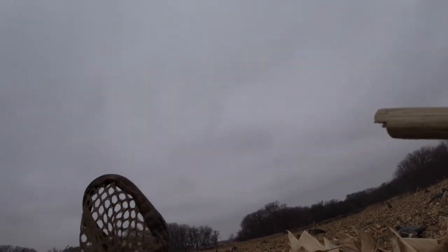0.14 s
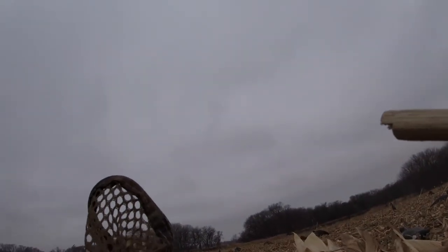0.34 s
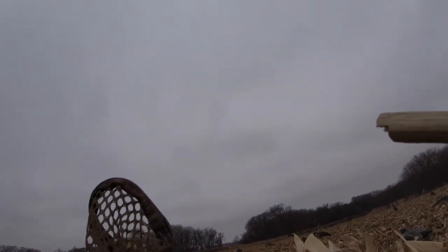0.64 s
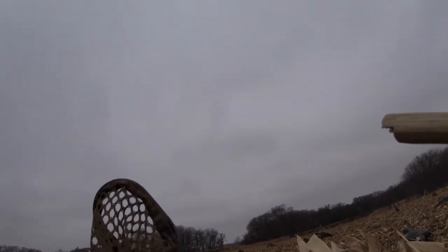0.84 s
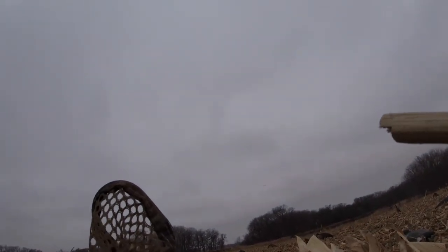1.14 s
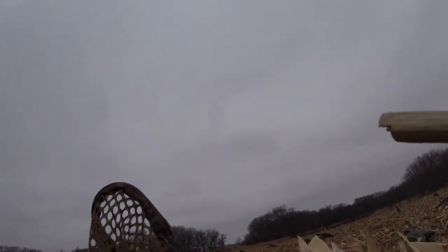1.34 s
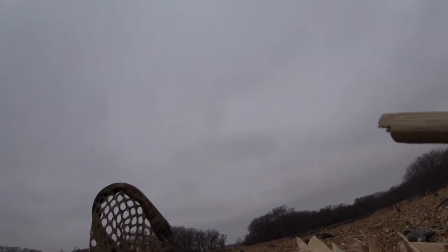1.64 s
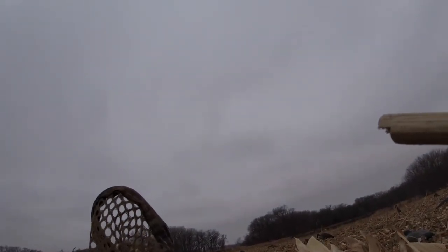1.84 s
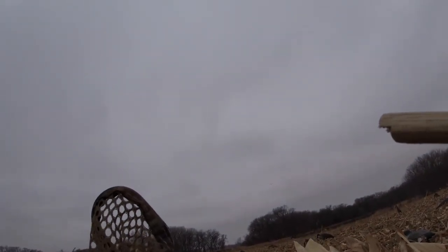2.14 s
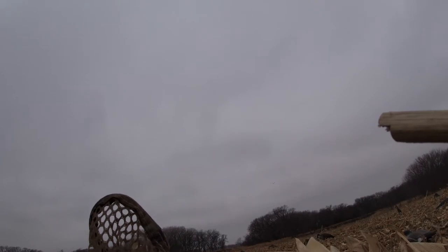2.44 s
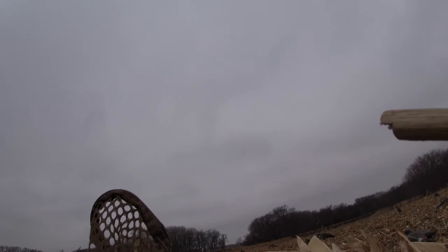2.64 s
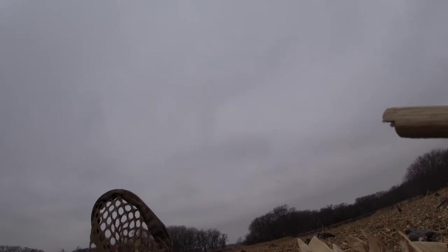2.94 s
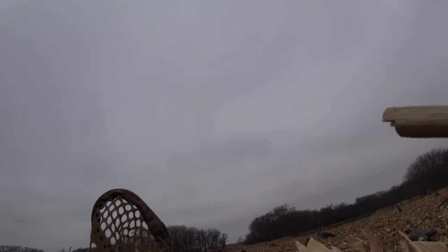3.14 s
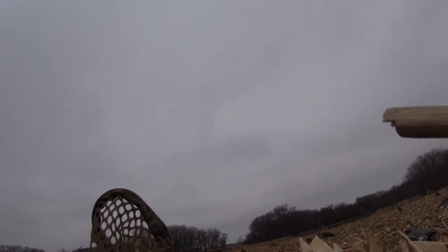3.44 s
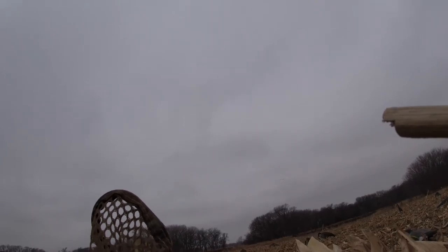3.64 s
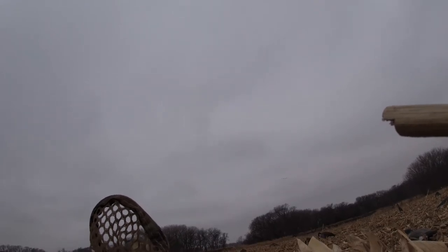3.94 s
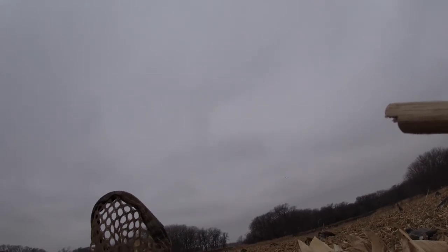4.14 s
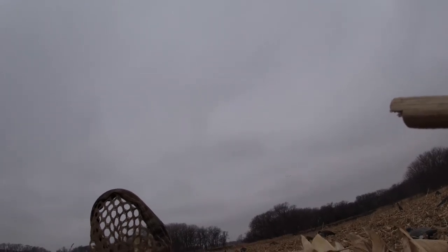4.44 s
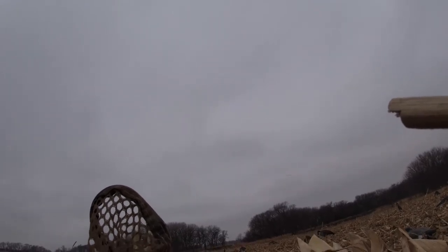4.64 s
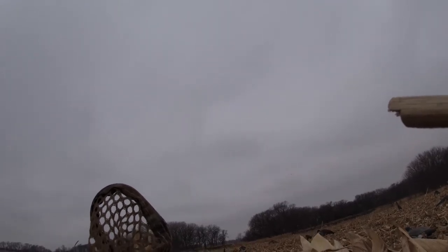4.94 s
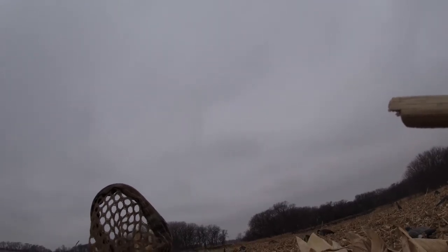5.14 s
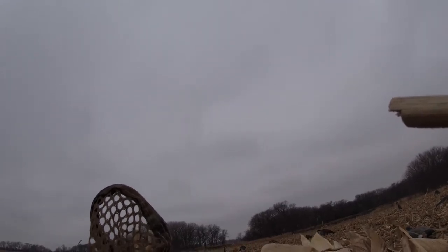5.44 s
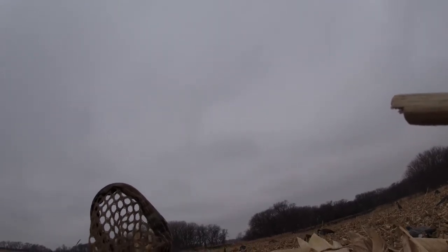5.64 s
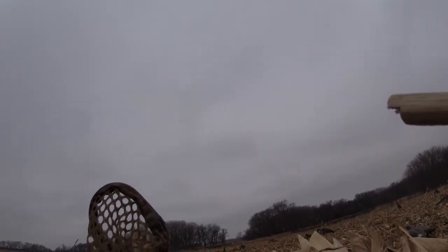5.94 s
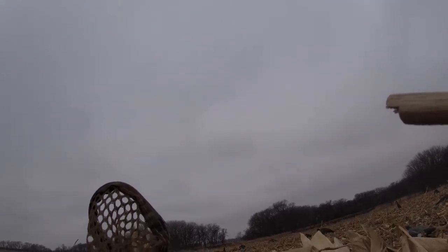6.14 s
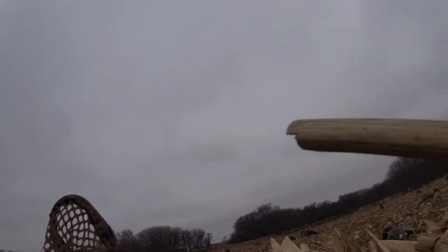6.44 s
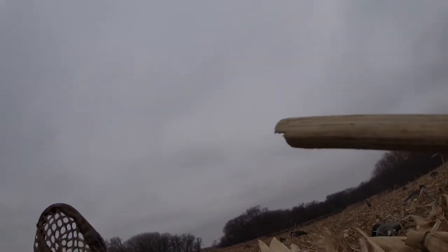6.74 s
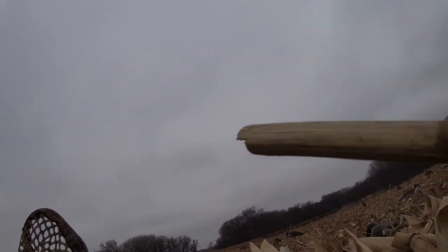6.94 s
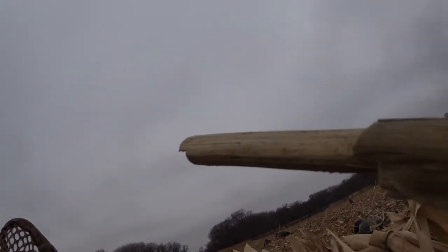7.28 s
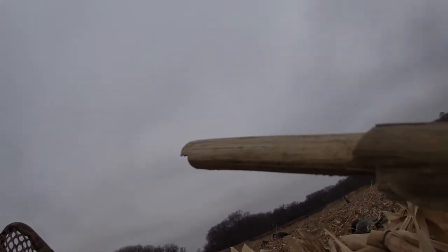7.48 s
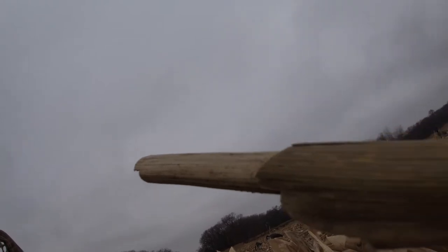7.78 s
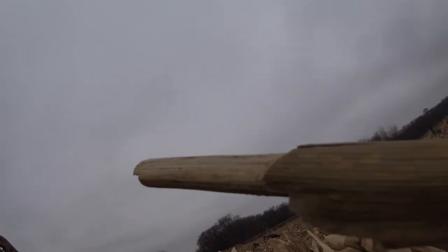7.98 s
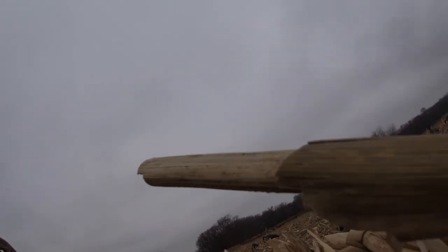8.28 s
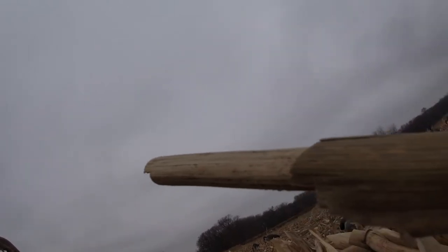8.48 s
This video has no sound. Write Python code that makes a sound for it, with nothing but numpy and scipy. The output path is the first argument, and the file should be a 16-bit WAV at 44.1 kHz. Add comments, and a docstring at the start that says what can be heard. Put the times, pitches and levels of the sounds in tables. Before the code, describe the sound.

Two reed goose calls trade low moans and short honks, one bright and one muffled, while wind buffets the microphone.

```python
"""Two goose calls in a windy stubble field

Two reed goose calls answer each other: a bright one aimed past the microphone and a muffled one close
behind it. Breath makes each reed moan on a low note, then break up into a honk. Wind buffets the
microphone, its housing is knocked a few times, dry stalks rustle and snap, and faint pips sound far off."""
import sys
import numpy as np
from scipy import signal
from scipy.fft import rfft, irfft
from scipy.io import wavfile
from scipy.ndimage import uniform_filter1d, minimum_filter1d

SR = 44100
rng = np.random.default_rng(int(sys.argv[2]) if len(sys.argv) > 2 else 0)


def inscribe(sig):
    """Save sig as 16-bit PCM at rate SR to the path in sys.argv[1].

    A 1-D sig is mono; a 2-D sig holds one channel per row.
    Samples are clipped to [-1, 1] before scaling.
    """
    pcm = np.round(np.clip(np.atleast_2d(sig).T, -1, 1) * 32767)
    wavfile.write(sys.argv[1], SR, pcm.astype(np.int16))


N = 379701

# Honks of the muffled call: (start [s], end [s], early pitch [Hz], pitch before the fall [Hz],
# end pitch [Hz], level [dB], treble boost [dB])
MUFFLED_HONK_NOTES = [ (2.082, 2.121, 643, 652, 530, -22, -2), (2.245, 2.308, 661.6, 636, 515, -23.5, -5),
                      (6.177, 6.316, 679, 659, 530, -26.5, 1.5), (6.376, 6.481, 665, 599, 500, -25, 0.5),
                      (7.413, 7.473, 701, 695, 557, -24.5, 1.5), (8.294, 8.35, 677, 661, 553, -24.5, -0.5)]


def bright_call():
    """A reed call rich in overtones: it moans, clucks and honks."""
    # Moans: (start [s], push of breath [s], end [s], pitch at each of those three times [Hz],
    # level [dB], treble boost [dB])
    moans = [ (0.813, 1.033, 1.165, 523.6, 512.7, 625, -45, 0),
             (2.826, 3.106, 3.172, 488.3, 550, 586, -45, 6),
             (4.051, 4.31, 4.372, 504.6, 551.3, 587, -48, 9.5),
             (8.566, 8.591, 8.61, 508, 519, 547, -41, 1.5)]
    # Blowing harder raises pitch and level together: (pitch [Hz], base tone [dB], overtones [dB])
    pressure = [(500, 2.5, -15), (547, 2, -10.5), (600, 12.5, 1)]
    # Wavering low notes, one list of points each: (time [s], pitch [Hz], level [dB])
    clucks = [
        [(3.3, 429, -43.5), (3.36, 439, -44.5), (3.4, 492, -34), (3.43, 500, -29.5), (3.472, 445, -49)],
        [(7.782, 512, -41), (7.825, 587, -37), (7.895, 598, -37), (7.915, 525, -38.5), (7.94, 500, -59.5)],
    ]
    # How the barrel colours the overtones of low notes: (frequency [Hz], gain [dB])
    barrel = [(900, 18), (1650, 12.5), (2400, -19.5), (2850, 1.5), (3300, -20), (4200, -17.5), (4800, -5),
              (5400, -21), (8000, -42)]
    # Honks: (start [s], break [s], end [s], top pitch [Hz], arch depth [share of pitch], sag [Hz/s],
    # pitch after the break [Hz], level [dB], overtone boost [dB])
    honks = [ (1.155, 1.224, 1.246, 816, 0.055, 1103, 707, -21, -3),
             (3.163, 3.274, 3.315, 881, 0.063, 2, 705, -18.5, 2.5),
             (4.365, 4.484, 4.525, 876.7, 0.072, -1, 694, -18.5, 1.5)]
    # A honk's harmonics, from the second up: (gain [dB])
    honk_overtones = [7, -7, -14.5, -20.5, -11.0, -20, -32, -41, -59.5, -61] + [-57] * 5
    # The reed beats unevenly: (start [s], end [s], depth [factor], hoarseness [factor])
    creaks = [(1.14, 1.255, .5, 1.), (3.115, 3.175, 1.1, .5), (3.265, 3.325, .55, .8),
              (3.375, 3.47, .9, .15), (4.33, 4.375, 1.1, .5), (4.48, 4.535, .55, .8), (7.82, 7.91, .9, .25),
              (7.89, 7.95, .6, .7)]
    low = [blown(row[:3], row[3:6], row[6], pressure) for row in moans]
    low += [[(s, hz, db, db - 14.5) for s, hz, db in cluck] for cluck in clucks]
    treble = [row[-1] for row in moans] + [4] * len(clucks)
    high = [bright_honk(*row) for row in honks]
    return (reed(low, barrel, creaks, treble_db=treble, treble_above=4)
            + reed(high, honk_overtones, creaks))


def bright_honk(start, split, end, top_hz, depth, sag, tail_hz, db, boost_db, break_s=0.0089):
    """Points of one honk: a high arch of pitch that breaks down into a short dull tail."""
    # The arch: (way to the break [0-1], pitch dip [times the depth], base tone [dB], overtones [dB])
    arch = [(0, .6, 2, -12), (0.399, 0.11, -2, -10.5), (.8, .27, -2, -13.5), (1, 1.16, -4, -15)]
    levels = np.array([db, db + boost_db])
    points = []
    for share, dip, *shape_db in arch:
        elapsed = share * (split - start)
        points.append((start + elapsed, top_hz * (1 - depth * dip) - sag * elapsed, *(levels + shape_db)))
    end_hz = tail_hz * (1 - 1.95 * (end - split - break_s))
    return points + [(split + break_s, tail_hz, *(levels + (-5.5, -26))),
                     (end, end_hz, *(levels + (-15, -34)))]


def muffled_call(grunt_hz=398, creak_s=.02):
    """A duller reed call: strong round moans and grunts, and short honks."""
    # Moans: (start [s], push of breath [s], end [s], pitch at each of those three times [Hz], level [dB])
    moans = [ (1.769, 2.002, 2.097, 383.7, 390.8, 416, -22),
             (5.672, 5.96, 6.06, 382.8, 392.9, 418.7, -18.5),
             (7.105, 7.297, 7.432, 409.3, 422.6, 436.3, -21.5), (8.006, 8.198, 8.307, 403, 413.2, 438, -20)]
    # Short low grunts around the honks: (start [s], length [s], level [dB])
    grunts = [(2.226, 0.034, -19.5), (2.306, 0.022, -22.5), (6.162, 0.029, -19), (6.305, 0.015, -19.5),
              (6.358, 0.033, -18.5)]
    # Harmonics of the low notes and of the honks, from the second up: (gain [dB])
    low_overtones = [-1, 8, -20.5, -21, -44]
    honk_overtones = [6.5, -9, -22.5, -23, -25, -26.5, -32, -39.5, -47.5]
    low = [muffled_moan(*row) for row in moans]
    low += [[(t, grunt_hz, db, db - 18.5) for t in (s, s + length)] for s, length, db in grunts]
    high = [muffled_honk(*row[:-1]) for row in MUFFLED_HONK_NOTES]
    treble = [row[-1] for row in MUFFLED_HONK_NOTES]
    # Low notes creak as they end; honks rasp at both ends.
    creaks = [(note[-1][0] - creak_s, note[-1][0] + creak_s, 1.4, .2) for note in low]
    rasps = [(s - creak_s, s + creak_s, .25, .9) for note in high for s in (note[0, 0], note[-1, 0])]
    return (reed(low, low_overtones, creaks)
            + reed(high, honk_overtones, rasps, dulling=19.5, treble_db=treble))


def muffled_moan(start, push, end, start_hz, push_hz, end_hz, db, scoop_s=0.045):
    """Points of one moan: it scoops up to pitch, creeps higher, then rises with a push of breath."""
    # Blowing harder raises pitch and level together: (pitch [Hz], base tone [dB], overtones [dB])
    pressure = [(383.6, -7, -31), (401, -1, -17), (438, 4, -12)]
    times = [start, start + scoop_s, push, end]
    hz = [.94 * start_hz, start_hz, push_hz, end_hz]
    if not any(abs(honk[0] - end) < scoop_s for honk in MUFFLED_HONK_NOTES):
        times, hz = times + [6.118], hz + [396]  # the one moan that runs into no honk sags away
    return blown(times, hz, db, pressure)


def muffled_honk(start, end, start_hz, hold_hz, end_hz, db, rise_s=0.011, fall_s=0.017):
    """Points of one honk: a quick flip up, a held high note, a drop at the end."""
    # Loudness at the start, top, middle, fall and end: (base tone [dB], overtones [dB])
    shape_db = [(-8, -12.5), (-3.5, -3.5), (-4.5, -1.5), (-4.5, -0.5), (-3.5, -6)]
    top, fall = start + rise_s, end - fall_s
    times = [start, top, (top + fall) / 2, fall, end]
    hz = [0.82 * start_hz, start_hz, start_hz - (start_hz - hold_hz) * 0.23, hold_hz, end_hz]
    return np.column_stack([times, hz, np.add(db, shape_db)])


def blown(times, pitches, db, pressure):
    """Points of a low note whose loudness follows its pitch, as both come from the breath."""
    t = np.linspace(times[0], times[-1], num=40)
    hz = np.interp(t, times, pitches)
    at_hz, base_db, over_db = np.transpose(pressure)
    return np.transpose([t, hz, db + np.interp(hz, at_hz, base_db), db + np.interp(hz, at_hz, over_db)])


def reed(notes, colour, creaks, dulling=0., treble_db=None, treble_above=2, jitter=.0012, slip=.002):
    """A vibrating reed makes a base tone plus overtones at whole multiples of its pitch.
    Each note is a list of points: (time [s], pitch [Hz], base tone [dB], overtones [dB])."""
    out, colour = np.zeros(N), np.transpose(colour)
    waver, hoarse = walk(150), walk(900)
    uneven_db = 3.5 * walk(20)  # each harmonic above the third swells and fades on its own
    for note, treble in zip(notes, treble_db or [0] * len(notes)):
        times, pitches, base_db, over_db = np.transpose(note)
        i = np.arange(int(times[0] * SR), min(int(times[-1] * SR), N))
        t = i / SR
        # Breath cannot change in an instant, so the pitch is smoothed.
        hz = uniform_filter1d(np.interp(t, times, pitches), int(0.0041 * SR), mode="nearest")
        slide = np.abs(np.gradient(np.log(hz))) * SR  # fast slides waver more and sound hoarse
        phase = 2 * np.pi * np.cumsum(hz * (1 + (jitter + slip * slide) * waver[i])) / SR
        sag = np.log(hz.max() / hz) * (t > t[np.argmax(hz)])  # with dulling, a falling note loses treble
        # The colour gives gains either by harmonic number or by frequency.
        gains = colour if colour.ndim == 1 else [np.interp(k * hz, *colour) for k in range(2, 16)]
        overtones = np.zeros(len(t))
        for k, db in enumerate(gains, start=2):
            db = db + (k > 3) * uneven_db[i - k * SR // 4]
            db = db + treble * (k > treble_above) - dulling * sag * max(k - 3, 0)
            overtones += undb(db) * np.sin(k * phase + np.pi / 4 * k * k)
        overtones *= undb(np.interp(t, times, over_db))
        base = undb(np.interp(t, times, base_db)) * np.sin(phase)
        # In a creak, strong and weak beats take turns, so half the pitch is heard too.
        beat = sum(depth * fade(t, start, end, 0.014) * (np.cos(phase / 2) + rasp * hoarse[i])
                   for start, end, depth, rasp in creaks)
        beat += 0.0048 * slide * hoarse[i]
        tone = base * (1 + 0.26 * beat) + overtones * (1 + beat)
        out[i] += np.sqrt(2) * tone * fade(t, times[0], times[-1], edge_s=.009)
    return out


def flutters(start_hz=274.4, db=-25):
    """The slack reed of the muffled call flutters between notes: soft, low, falling tones."""
    # Flutters: (start [s], length [s])
    moments = [(6.108, 0.069), (6.317, 0.049)]
    out = np.zeros(N)
    for s, length in moments:
        t = np.arange(int(length * SR)) / SR
        tone = np.sin(2 * np.pi * start_hz * t * (1 - 2.2 * t))
        add(out, s, undb(db) * np.sin(np.pi * t / length) * tone)
    return out


def with_echo(calls, tail_db=-25, tail_t60_s=.1):
    """Sound bounces off the ground and the hunting blind, adding a short tail."""
    t = np.arange(SR // 5) / SR
    tail = rng.standard_normal(len(t)) * np.exp(-np.log(1000) * t / tail_t60_s)
    return calls + undb(tail_db) * signal.fftconvolve(calls, tail / np.linalg.norm(tail))[:N]


def wind(kicks_per_s=120):
    """Wind rumbles and its swirls kick the microphone's membrane; stronger gusts reach higher in pitch."""
    # Gusts: (time [s], rumble [dB], buffeting before each band scales it [dB])
    gusts = [(0, -69, -56.5), (0.498, -45.5, -44), (0.658, -22, -29.5), (1.15, -38, -44.5),
             (1.389, -26, -30), (1.951, -34.5, -39), (2.601, -30.5, -30.5), (2.68, -31.5, -52.5),
             (3.351, -60, -64.5), (3.521, -32, -31.5), (4.028, -24, -34.5), (4.461, -45, -55),
             (4.583, -26, -25.5), (4.721, -35.5, -41), (4.93, -48, -58), (5.21, -71, -56),
             (5.295, -27, -36.5), (5.35, -60, -51), (5.43, -24, -30.5), (5.7, -36, -41.5),
             (6.4, -48, -43.5), (6.72, -24, -27.5), (6.8, -28.5, -39), (7.41, -39.5, -38),
             (7.49, -22.5, -28.5), (7.68, -42.5, -38.5), (7.78, -52, -60), (8.098, -65, -61.5),
             (8.61, -37, -46)]
    # Single swirls that thump the membrane: (start [s], level [dB], pitch [Hz])
    thumps = [(0.675, -7.5, 163), (0.996, -17.5, 159), (1.037, -18, 113), (1.251, -18.5, 131),
              (1.606, -12.5, 88), (2.595, -12, 150), (3.958, -15, 130), (4.654, -18, 184),
              (6.683, -15, 143), (7.475, -13, 159), (8.01, -12.5, 158)]
    times, *curves = np.transpose(gusts)
    lumps_db = 3.5 * walk(30)
    rumble_db, buffet_db = (np.interp(np.arange(N) / SR, times, db) + lumps_db for db in curves)
    kicks = (rng.random(N) < kicks_per_s / SR) * rng.standard_normal(N)
    kicks *= undb(np.minimum(4 * rng.exponential(size=N), 8))
    rough_air = unit(kicks) + 0.8 * rng.standard_normal(N)
    out = unit(steep(rng.standard_normal(N), 24, 76.7)) * undb(rumble_db + 4.74 * walk(11))
    for hz, band_db, growth in [(97.0, -30.5, 1.32), (203.3, -37.0, 1.73), (407, -57, 1.5)]:
        swirls = unit(steep(rough_air, hz / 1.243, hz * 1.772))
        out += swirls * undb(band_db + growth * (buffet_db + 31.0))
    for s, db, hz in thumps:
        t = np.arange(int(2.2 / hz * SR)) / SR
        add(out, s, undb(db) * np.sin(np.pi * t / t[-1]) ** 2 * np.sin(2 * np.pi * hz * t))
    return out


def knocks(scrape_s=0.025):
    """A short scrape grows into a tick that rings the plastic housing and rattles out."""
    # Knocks on the housing: (time [s], strength [dB])
    hits = [(.268, -17.5), (.32, -53), (5.168, -52), (5.648, -25), (6.749, -34.5)]
    # Tones the housing rings at: (frequency [Hz], gain [dB], time to fade by 60 dB [s])
    housing = [(263, 17, 0.023), (755, 20.5, 0.012), (1270, 26, 0.0023)]
    out, t = np.zeros(N), np.arange(SR // 10) / SR - scrape_s
    after = np.maximum(t - .001, 0)
    ring = sum(undb(db) * np.exp(-np.log(1000) * after / t60) * np.sin(2 * np.pi * hz * after)
               for hz, db, t60 in housing)
    for (s, db), noise in zip(hits, rng.standard_normal((len(hits), len(t)))):
        rattle = steep(noise, 510, 5060) * np.exp(np.where(t < 0, t / 0.0033, -t / 0.0053))
        tick = band(noise, 580, 12000) * np.exp(-np.abs(t - .0015) / 0.00041)
        add(out, s - scrape_s, undb(db) * (ring + undb(11.5) * rattle + tick))
    return out


def high_shimmer(lasts_s=0.45):
    """A faint, narrow, high hiss lingers about half a second after three of the knocks, then stops."""
    # Shimmers: (start [s], frequency [Hz], strength [dB])
    shimmers = [(.268, 9100, -59), (5.648, 9040, -64), (6.749, 9950, -64)]
    out, t = np.zeros(N), np.arange(SR) / SR
    for (s, hz, db), noise in zip(shimmers, rng.standard_normal((len(shimmers), len(t)))):
        add(out, s, undb(db) * steep(noise, .97 * hz, 1.035 * hz) * np.exp(-(t / lasts_s) ** 8))
    return out * undb(1.5 * walk(25))


def snaps(decay_s=0.0077):
    """Dry stalks crack close by, each a burst of noise that dies fast."""
    # Cracks: (time [s], strength [dB])
    cracks = [(1.096, -32.5), (3.564, -37), (3.676, -37.5), (6.6448, -34.5), (6.895, -31), (7.502, -32),
              (7.569, -33), (7.649, -34)]
    out, t = np.zeros(N), np.arange(SR // 25) / SR
    for (s, db), noise in zip(cracks, rng.standard_normal((len(cracks), len(t)))):
        add(out, s, undb(db) * steep(noise, 800, 4630) * np.exp(-t / decay_s))
    return out


def stubble(band_ratio=1.3):
    """Air hisses through the stubble and dry stalks tick, more often as the rustle swells."""
    # Colour of the hiss: (frequency [Hz], relative level [dB])
    spectrum = [(90, -34.5), (170, -3), (330, -21.5), (1600, -28.5), (2500, -31.5), (5600, -36),
                (6400, -51.5), (10500, -53), (11500, -65.5), (15500, -70.5)]
    # Loudness of the rustle: (time [s], level [dB])
    rustle_levels = [(0, -51.5), (2.099, -49), (4.0, -45.5), (4.804, -54), (6.403, -51), (6.799, -45),
                     (7.76, -44), (8.61, -50)]
    # Bands the stalks tick in: (centre [Hz], gain at a rustle of -50 dB [dB])
    crackle_bands = [(2900, -46), (4600, -51)]
    freqs, colour_db = np.transpose(spectrum)
    colour = undb(np.interp(np.log(np.arange(N // 2 + 1) * SR / N + 1), np.log(freqs), colour_db))
    rustle = undb(np.interp(np.arange(N) / SR, *np.transpose(rustle_levels)) + 2.4 * walk(9))
    swell = rustle / undb(-50)

    def ticks(per_s, decay_s=.003):
        """Tiny bursts of noise at random moments."""
        clicks = (rng.random(N) < per_s * swell / SR) * undb(np.minimum(3 * rng.exponential(size=N), 9))
        return signal.lfilter([1], [1, -np.exp(-1 / (decay_s * SR))], clicks) * rng.standard_normal(N)
    hiss = unit(irfft(rfft(rng.standard_normal(N) + ticks(45)) * colour, N)) * rustle
    return hiss + sum(undb(db) * swell * steep(ticks(20), hz / band_ratio, hz * band_ratio)
                      for hz, db in crackle_bands)


def pips(hz=1610, spread_hz=70, length_s=0.036):
    """Faint blurred blips around one pitch, perhaps far geese."""
    # Blips: (start [s], level [dB])
    blips = [(1.32, -50), (1.376, -48), (1.46, -51), (3.61, -50), (3.685, -50)]
    loudness = np.zeros(N)
    blur = unit(band(rng.standard_normal(N), hz - spread_hz, hz + spread_hz))
    for s, db in blips:
        add(loudness, s, undb(db) * np.hanning(int(length_s * SR)))
    return loudness * blur


def undb(db):
    """Turn decibels into a gain factor."""
    return 10 ** (np.asarray(db) / 20)


def unit(x):
    """Scale a signal to an average power of 1."""
    return x / np.sqrt(np.mean(x ** 2))


def walk(rate):
    """A smooth random wobble of size about 1, with `rate` new values a second."""
    hold = int(SR / rate)
    steps = np.repeat(rng.standard_normal(N // hold + 1), hold)
    return unit(uniform_filter1d(uniform_filter1d(steps, hold), hold)[:N])


def add(out, s, x):
    """Mix x into out, starting at s seconds."""
    i = int(s * SR)
    out[i:i + len(x)] += x[:N - i]


def band(x, lo_hz, hi_hz):
    """Keep the sound between two frequencies."""
    return signal.sosfilt(signal.butter(2, [lo_hz, hi_hz], "band", fs=SR, output="sos"), x)


def steep(x, lo_hz, hi_hz):
    """Filter twice for a band with sharper edges."""
    return band(band(x, lo_hz, hi_hz), lo_hz, hi_hz)


def fade(t, start, end, edge_s):
    """A gain that ramps up after start and down before end."""
    return np.clip(np.minimum(t - start, end - t) / edge_s, 0, 1)


def scene():
    """Mix the calls and the sounds around them into one channel."""
    calls = with_echo(bright_call() + muffled_call() + flutters())
    return (calls + pips() + wind() + knocks() + high_shimmer() + stubble() + snaps())[None]


def record(dry, limit=.38, top_hz=15700):
    """A limiter turns the gain down around the loudest peaks; a filter cuts the highest treble."""
    span = SR // 100
    peak = uniform_filter1d(-minimum_filter1d(-np.abs(dry), 2 * span), span)
    limited = dry * limit / np.maximum(peak, limit)
    return signal.sosfilt(signal.ellip(8, .2, 70, top_hz, fs=SR, output="sos"), limited)


dry = scene()
out = record(dry)
inscribe(out)
```